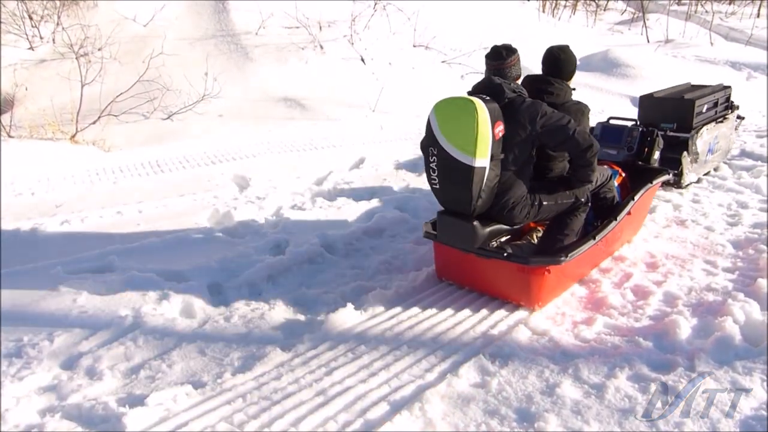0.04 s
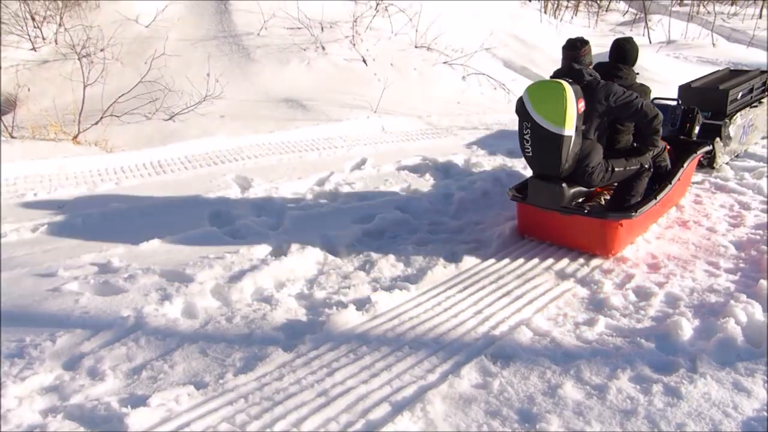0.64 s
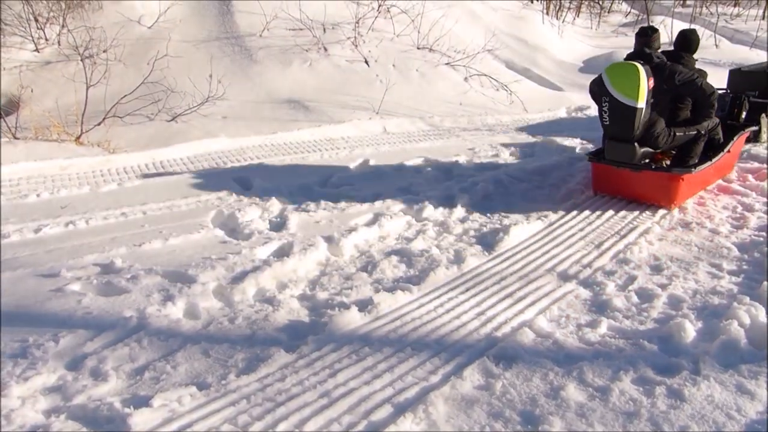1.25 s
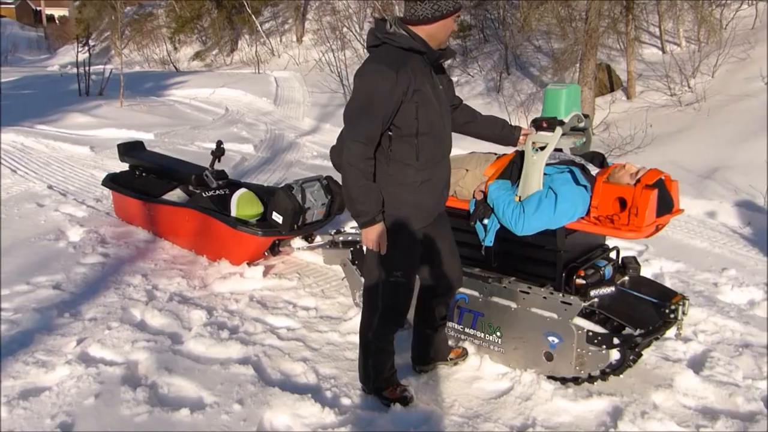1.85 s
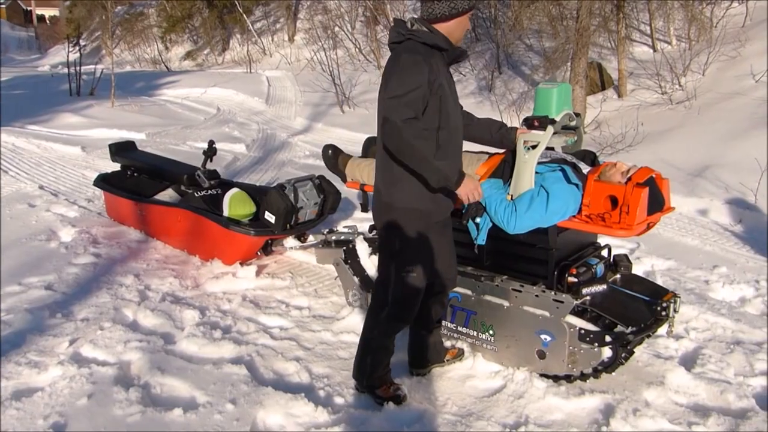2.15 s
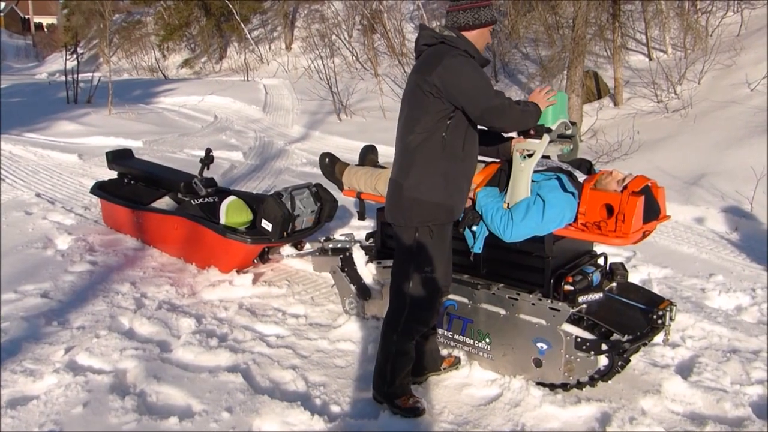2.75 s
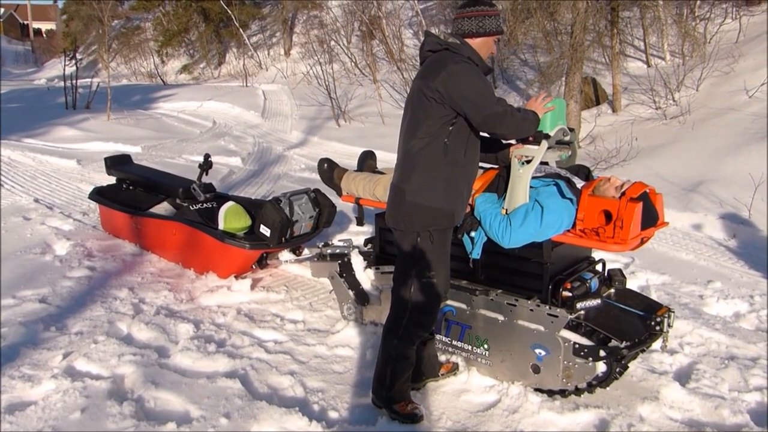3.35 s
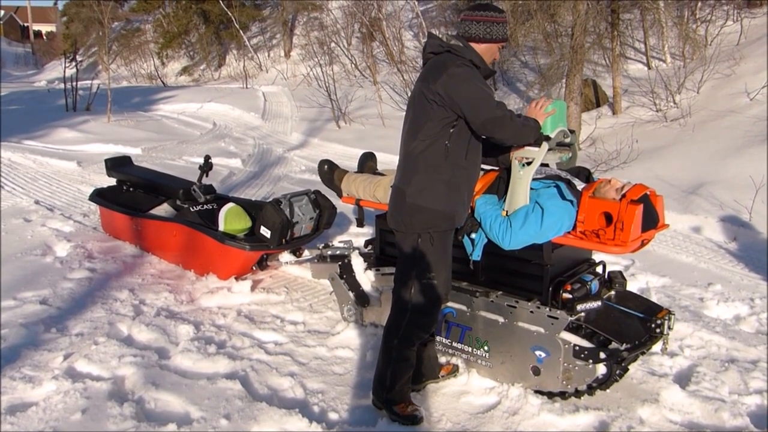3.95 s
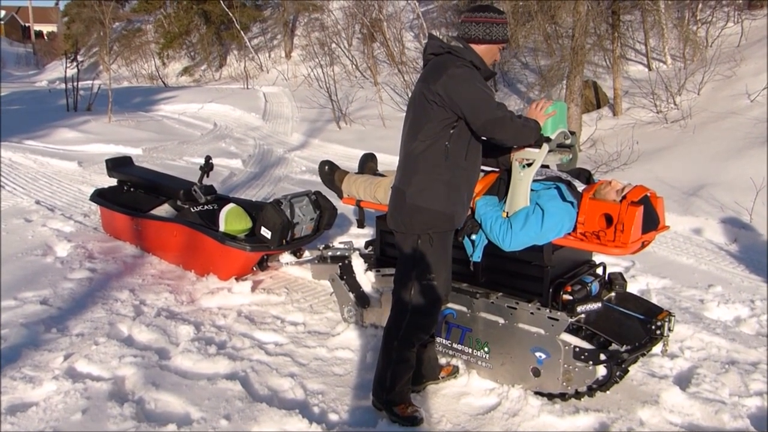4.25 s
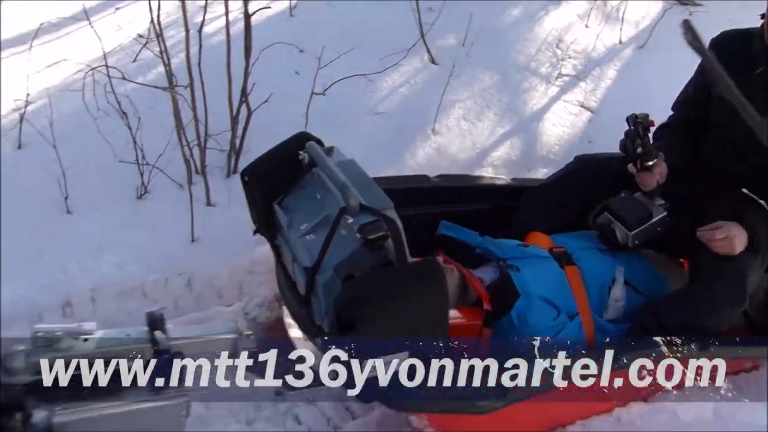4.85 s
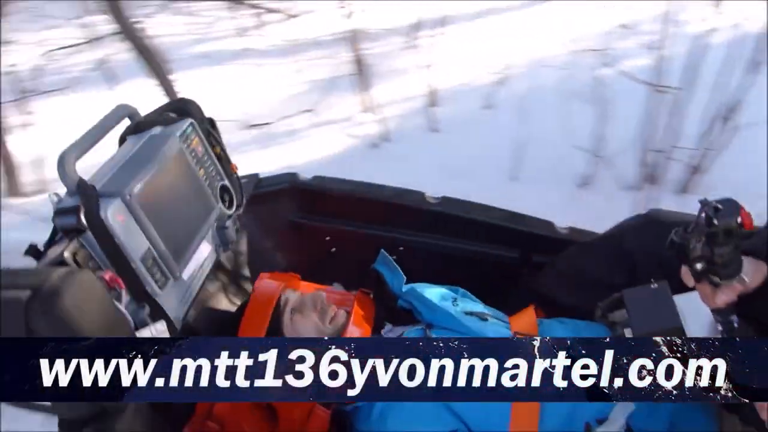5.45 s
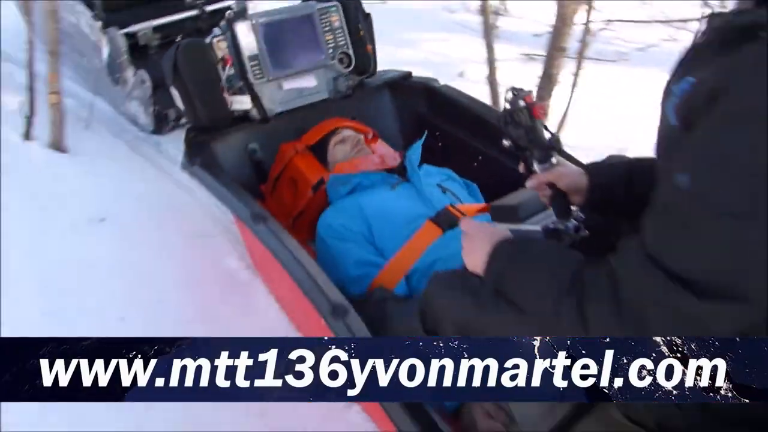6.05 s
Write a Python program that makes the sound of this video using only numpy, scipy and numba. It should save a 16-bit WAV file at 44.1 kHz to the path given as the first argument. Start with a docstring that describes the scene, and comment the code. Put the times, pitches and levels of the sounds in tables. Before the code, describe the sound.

A sled grinds away across snow, a jacket swishes in quiet woods, then snow hisses and thumps against the moving plastic hull.

```python
"""An electric tracked tug pulls a plastic sled over crusty snow, in three moments joined by hard cuts.
It drives away, track and sled grinding the crust under a hiss of loose snow. It stands in a quiet wood
while a jacket swishes, a boot creaks, gear clicks and a far bird calls. Then we ride the sled: snow sprays
and scrapes, lumps thud against the drumming hull, and the whine of the drive sinks as it slows."""
import sys
import numpy as np
from scipy import signal
from scipy.fft import rfft, irfft, next_fast_len
from scipy.io import wavfile
from scipy.ndimage import uniform_filter1d
from numba import njit

SR = 44100
rng = np.random.default_rng(int(sys.argv[2]) if len(sys.argv) > 2 else 0)


def put_to_file(sound):
    """Save the sound as 16-bit audio at rate SR, in the file named by the first command-line argument."""
    columns = np.atleast_2d(sound).T  # one column per channel
    safe = np.clip(columns, -1, 1)
    whole_steps = np.round(safe * 32767)
    wavfile.write(sys.argv[1], SR, whole_steps.astype(np.int16))


N = 269010
TIME = np.arange(N) / SR
LEAVE_END_S, RIDE_START_S = 1.728, 4.660

# speed of the leaving tug, as the pitch of its drive: t/s, f/Hz
LEAVING_PITCH = [(0, 1690), (1.27, 1480), (1.73, 1270)]
# loose snow thrown up as it leaves: t/s, level/dB
LEAVING_SPRAY = [(0, -31.5), (0.16, -33.3), (0.33, -32.5), (0.45, -31.5), (0.55, -33.0), (0.77, -31),
                 (0.92, -33), (0.98, -35), (1.08, -33.5), (1.16, -34), (1.29, -33), (1.36, -35),
                 (1.46, -32.5), (1.57, -33.5), (1.7, -32)]
# hollow resonances of the grinding: multiple of the lowest, filter width/Hz, gain/dB
GRIND_MODES = [(1, 258, -7.5), (1.94, 410, -6), (2.45, 2320, -5)]
# the lowest one swells and ebbs with the crust: middle t/s, half-width/s, gain/dB
GRIND_GROWLS = [(.22, .05, 3), (.49, .03, -0.5), (.76, 0.054, -6), (1.15, .035, 1.5), (1.55, 0.02, 5.5),
                (1.68, 0.057, 3)]
# tone colours of the leaving sled's snow hiss and hull rumble: f/Hz, relative level/dB
FAR_HISS_EQ = [(450, -16.5), (560, -2), (900, 0), (1150, 0.5), (2000, -0.5), (2700, -2.5), (3650, -3.5),
               (4100, 1), (4400, -6.5), (4800, 1.5), (6000, -0.5), (8700, 1), (11000, -3.5), (14500, -12.5),
               (16000, -25)]
FAR_RUMBLE_EQ = [(25, -7), (62, -42), (110, -3.5), (220, 1), (330, 0.5), (440, -6), (540, 2.5), (700, -40),
                 (1500, -28)]
# the sled heaves over ridges; the drive labours: middle t/s, half-width/s, level/dB
RIDGE_SWELLS = [(.15, 0.044, -46.5), (.295, 0.017, -43.5), (.68, 0.1, -49), (1.15, 0.033, -47),
                (1.38, .03, -45), (1.56, 0.14, -47.5)]
LABOUR_SWELLS = [(.03, 0.058, -47), (.66, 0.035, -42), (.98, 0.098, -42), (1.57, 0.045, -43)]
# path of a dip in the hiss: t/s, f/Hz
DIP_PATH = [(.95, 4700), (1.1, 3950), (1.22, 3320), (1.42, 2950)]
# crust chunks hit the sled; gear is handled: t/s, level/dB, f/Hz, nominal width/Hz, t60/s
CRUST_CLACKS = [(1.143, -33, 1250, 600, .07), (1.264, -26, 790, 300, 0.044), (4.698, -27, 740, 400, 0.081),
                (4.935, -26.5, 810, 250, 0.11), (5.294, -27.5, 830, 350, .06), (5.358, -25, 434, 160, 0.13),
                (5.413, -25, 770, 400, 0.04), (5.462, -26, 12500, 3500, .04), (5.581, -24, 900, 350, 0.045),
                (5.707, -27.5, 900, 350, 0.046), (5.984, -26, 710, 400, 0.036),
                (6.088, -25.5, 706, 400, 0.084)]
GEAR_TAPS = [(1.860, -53, 6000, 9000, 0.026), (1.956, -35.5, 4260, 4500, 0.041),
             (2.017, -41, 4000, 6000, 0.05), (2.2165, -33.5, 1100, 900, 0.029),
             (2.219, -32, 6650, 9000, 0.03), (2.217, -35, 280, 500, 0.021), (2.230, -50, 5000, 9000, 0.083),
             (2.371, -36.5, 2290, 7000, 0.02), (2.512, -45, 990, 700, .04), (2.521, -34, 950, 800, 0.032),
             (2.683, -47, 10960, 400, 0.056), (2.685, -53, 7850, 400, .05)]
# tone colours of the open air, mid and side: f/Hz, relative level/dB
AIR_MID_EQ = [(25, -11), (60, -13), (130, -11), (220, -4.5), (340, -5.5), (520, -2), (780, 1.5), (1200, -7),
              (1700, -14), (2300, -17.5), (3200, -22), (4300, -22), (5000, -21.5), (9500, -22),
              (15500, -28)]
AIR_SIDE_EQ = [(60, -26), (130, -14), (220, 1), (500, -4), (780, -2), (1200, -5), (1800, -13), (3200, -17),
               (9500, -20), (15000, -24)]
# faint tones fluttering in the air: f/Hz, filter width/Hz, level/dB
AIR_TONES = [(1404, 160, -72.5), (1930, 160, -85), (2540, 160, -89)]
# strokes of a jacket sleeve: middle t/s, half-width/s, level/dB
SLEEVE_STROKES = [(1.79, 0.14, -64.5), (1.948, 0.022, -50), (1.995, .012, -51), (2.026, 0.015, -50),
                  (2.11, 0.08, -63), (2.44, 0.13, -58.5), (2.545, 0.025, -47.5), (2.69, 0.1, -62),
                  (3.62, 0.077, -70), (4.55, 0.089, -76)]
# tone colours of rubbing fabric and of snow under a sole: f/Hz, relative level/dB
SLEEVE_EQ = [(300, -4), (1500, -4), (3200, -6), (5500, -3.5), (8000, -2.5), (11000, -4), (15000, -13)]
BOOT_EQ = [(100, -18), (330, -25), (480, -10), (750, 1), (1000, 0), (1220, -1), (1450, 0), (1850, 0),
           (2300, -9), (2900, -16), (4500, -6), (8000, -21)]
# a boot presses the snow: start t/s, hold/s, level/dB
BOOT_PRESSES = [(1.943, 0.10, -57.5), (2.322, 0.17, -63.5), (2.502, 0.063, -45.5)]
# creak of the packed snow: f/Hz, width/Hz, gain/dB
CREAK_MODES = [(1010, 120, -6), (1520, 90, -16), (1760, 77, -12)]
# far-off pips: t/s, level/dB
PIP_CUES = [(3.09, -69), (3.385, -62), (3.885, -66)]
# snow spraying beside the ridden sled: t/s, level/dB
RIDE_SPRAY = [(4.7, -27), (4.83, -28.0), (4.93, -27.5), (5.1, -28), (5.3, -26.5), (5.46, -27.0), (5.6, -30),
              (5.88, -27.5), (6.08, -29)]
# tone colours of snow against the hull on the ride: f/Hz, relative level/dB
NEAR_HISS_EQ = [(2590, -34), (4400, -7.5), (4790, -3), (5520, 0), (8450, -0.5), (13000, -15.5),
                (14600, -24), (15500, -46)]
CRUNCH_EQ = [(900, -10), (1500, 4.5), (2200, 0.5), (3000, 1.5), (3600, -0.5), (4080, 3), (4400, -5.5),
             (5500, -18), (9000, -30)]
SCRAPE_EQ = [(250, -28), (370, 1.5), (440, 9.5), (540, 1.5), (640, 3), (790, 7.5), (920, 2.5), (1300, -0.5),
             (1700, -21), (3000, -28)]
DRUM_EQ = [(25, -33), (55, -43), (85, -12), (120, -3.5), (175, 4.5), (280, 3), (360, -6.5), (500, -38),
           (1000, -56)]
# whine of the drive on the ride: t/s, f/Hz, level/dB
RIDE_WHINE = [(4.66, 1810, -35.5), (4.77, 1735, -39), (4.85, 1695, -43), (4.93, 1665, -35),
              (4.98, 1630, -45), (5.02, 1605, -37), (5.07, 1570, -42), (5.12, 1620, -42), (5.17, 1615, -38),
              (5.23, 1570, -45), (5.26, 1380, -45), (5.30, 1310, -39.5), (5.37, 1240, -52),
              (5.5, 1187, -53)]
# lumps of snow hit the hull: t/s, level/dB, f/Hz
SNOW_LUMPS = [(4.700, -23, 196), (4.768, -20, 225), (4.964, -17, 213), (5.019, -24, 290), (5.073, -22, 250),
              (5.106, -21, 277), (5.136, -22, 201), (5.175, -32, 215), (5.235, -24.5, 216),
              (5.359, -22, 187), (5.414, -18.5, 245), (5.443, -25, 257), (5.482, -26.5, 241),
              (5.531, -21.5, 225), (5.539, -21, 153), (5.589, -19.5, 205), (5.633, -15, 188),
              (5.69, -24, 173), (5.71, -28, 240), (5.745, -20, 209), (5.785, -21.5, 193),
              (5.879, -22.5, 212), (5.904, -23.5, 204), (5.947, -23, 188), (5.983, -9.5, 236)]
# modes of the plastic hull: multiple of the lump's pitch, t60/s, relative level/dB
HULL_MODES = [(.68, .04, -4), (1, 0.027, 15.5), (1.5, 0.023, 11.5), (3.4, .014, -12)]


def undb(db):
    return 10 ** (np.asarray(db) / 20)


def unit(x):
    """Scale to rms 1."""
    return x / np.sqrt(np.mean(x ** 2))


def curves(table):
    """The columns of a table, joined by straight lines in time."""
    s, *columns = np.transpose(table)
    return [np.interp(TIME, s, c) for c in columns]


def swell(middle_s, width_s):
    """A rounded rise to 1 and fall."""
    return 1 / np.cosh(np.clip((TIME - middle_s) / width_s, -30, 30))


def swells(table):
    """Gain of a row of overlapping swells."""
    return np.sqrt(sum((undb(db) * swell(s, width)) ** 2 for s, width, db in table))


def step(middle_s, time_s):
    """A smooth change from 0 to 1."""
    return (1 + np.tanh((TIME - middle_s) / time_s)) / 2


def walk(rate_hz):
    """Smooth random wandering, spread near 1."""
    k = max(int(SR / rate_hz), 1)
    steps = np.repeat(rng.standard_normal(N // k + 1), k)[:N]
    return 1.64 * uniform_filter1d(uniform_filter1d(steps, k), k)


def grains(per_s, spread_db):
    """Two unrelated streams of random-sized clicks, as of breaking snow crystals."""
    hit = rng.random((2, N)) < per_s / SR
    return hit * rng.standard_normal((2, N)) * undb(spread_db * rng.standard_normal((2, N)))


def colour(x, eq):
    """Shape by an EQ curve; rms 1."""
    hz, db = np.transpose(eq)
    size = next_fast_len(N)
    f = np.maximum(np.fft.rfftfreq(size, 1 / SR), 1)
    gain = undb(np.interp(np.log(f), np.log(hz), db))
    return unit(irfft(rfft(x, size) * gain, size)[..., :N])


@njit
def svf(x, hz, width):
    """State-variable band-pass with a moving centre."""
    y, band, low = np.empty(len(x)), 0., 0.
    for i in range(len(x)):
        g, k = np.tan(np.pi * hz[i] / SR), width / hz[i]
        v = (band + g * (x[i] - low)) / (1 + g * (g + k))
        band, low, y[i] = 2 * v - band, low + 2 * g * v, k * v
    return y


def ring(x, hz, width):
    """Pass every channel through one resonance."""
    return np.array([svf(c, hz * np.ones(len(c)), float(width)) for c in x])


def steep_ring(x, hz, width):
    """The same resonance twice, for a tighter band; rms 1."""
    return unit(ring(ring(x, hz, width), hz, width))


def stereo(pair, side_db, pan_db=0):
    """Use two streams as mid and side, leaning left by pan_db."""
    mid, side = pair[0], pair[1] * undb(side_db)
    return np.array([(mid + side) * undb(pan_db / 2), (mid - side) * undb(-pan_db / 2)])


def grinding(start_hz=820, fade_db_per_s=1.15):
    """Track and sled grind the crust through hollow resonances that sink with speed and fade away."""
    speed, = curves(LEAVING_PITCH)
    lowest_hz = start_hz * (speed / speed[0]) ** .65
    modes = []
    for multiple, width, db in GRIND_MODES:
        hz = multiple * lowest_hz * (1 + 0.029 * walk(24.93))
        modes.append(steep_ring(grains(7000, 1.33), hz, width) * undb(db + 0.56 * walk(21.7)))
    growl_db = sum(db * swell(s, width) for s, width, db in GRIND_GROWLS)
    dull_db = -6.5 * step(1.32, 0.034)  # the upper resonances drop away
    grind = modes[0] * undb(growl_db) + sum(modes[1:]) * undb(dull_db)
    return stereo(grind, side_db=-25.5) * undb(-0.33 - fade_db_per_s * TIME)


def far_snow():
    """Grinding and the hiss of loose snow rise and fall together as the tug leaves."""
    spray_db, = curves(LEAVING_SPRAY)
    crust_db = 0.45 * walk(34.94)  # harder and softer patches
    grind = grinding()
    hiss = stereo(colour(grains(22000, 0.95), FAR_HISS_EQ), side_db=-18) * undb(0.72)
    return (grind + hiss) * undb(spray_db + crust_db)


def far_rumble(fade_db_per_s=5.5):
    """The leaving hull rumbles as it heaves over ridges."""
    heave = np.hypot(undb(-47 - fade_db_per_s * TIME), swells(RIDGE_SWELLS))
    return stereo(colour(grains(900, 2.2), FAR_RUMBLE_EQ), side_db=-19) * heave


def gear_tone(hz, rough, flicker_db):
    """A whine shaken in pitch and level by the track's uneven load, out of step left and right."""
    phase = 2 * np.pi * np.cumsum(hz * (1 + rough * walk(260))) / SR
    return np.sqrt(2) * np.sin(phase + np.array([[0], [.25]])) * undb(flicker_db * walk(90))


def far_drive():
    """The electric drive peeks through the grinding whenever it labours."""
    hz, = curves(LEAVING_PITCH)
    return gear_tone(hz * (1 + 0.0152 * walk(70)), rough=0.0182, flicker_db=2) * swells(LABOUR_SWELLS)


def track_frame(start_s=0.73, fade_db_per_s=7.5):
    """The track frame starts a bright ring, then dies away."""
    envelope = step(start_s, .05) * undb(-42.5 - fade_db_per_s * (TIME - start_s))
    return stereo(steep_ring(grains(4000, 2.2), hz=4150, width=380), side_db=-29) * envelope


def sliding_dip(snow, depth_db=-2.5):
    """A hollow opens in the hiss, slides down in pitch and closes again."""
    hz, = curves(DIP_PATH)
    cut = 1 - undb(depth_db * swell(1.2, .2))
    return snow - ring(snow, hz, width=500) * cut


def knocks(table, side_db, attack_s=0.0024):
    """Small hard things strike: a short noise burst in one resonance each."""
    age = np.arange(SR // 6) / SR
    attack = 1 - np.exp(-age / attack_s)
    out = np.zeros((2, N + len(age)))
    for s, db, hz, width, t60 in table:
        burst = steep_ring(rng.standard_normal((2, len(age))), hz, 1.16 * width)
        out[:, int(s * SR):][:, :len(age)] += burst * attack * undb(db - 60 * age / t60)
    return stereo(out[:, :N], side_db)


def wood_air():
    """A soft bed of open air with faint fluttering tones in it."""
    mid = colour(rng.standard_normal(N), AIR_MID_EQ)
    side = colour(rng.standard_normal(N), AIR_SIDE_EQ)
    air = stereo([mid, side], side_db=-14) * undb(-61.5 + .5 * walk(5.43))
    tones = sum(steep_ring(rng.standard_normal((2, N)), hz, width) * undb(db + 1.5 * walk(25))
                for hz, width, db in AIR_TONES)
    return air + stereo(tones, side_db=-20)


def jacket_and_boot(attack_s=0.013, release_s=0.021):
    """Fabric swishes and a boot packs the snow with a hollow creak, both in small uneven slips."""
    slips_db = 1.5 * walk(110)
    swish = colour(grains(12000, 1), SLEEVE_EQ) * swells(SLEEVE_STROKES)
    weight = np.zeros(N)
    for s, hold, db in BOOT_PRESSES:
        press = np.clip((TIME - s) / attack_s, 0, 1)
        release = np.exp(-np.maximum(TIME - s - hold, 0) / release_s)
        weight += undb(db) * press * release
    creak = sum(unit(ring(grains(1500, 2), hz, width)) * undb(db) for hz, width, db in CREAK_MODES)
    crunch = colour(grains(3500, 2.9), BOOT_EQ) * undb(-1.5)
    return stereo((swish + (crunch + creak) * weight) * undb(slips_db), side_db=-17.5)


def pips(hz=1340, width_s=0.012):
    """Short, wavering far-off tones, all at one pitch."""
    phase = 2 * np.pi * np.cumsum(hz * (1 + 0.0245 * walk(150))) / SR
    return np.sqrt(2) * np.sin(phase) * swells([(s, width_s, db) for s, db in PIP_CUES])


def bird(at_s=4.408, db=-68):
    """A small bird far off: one thin note that rises and levels out."""
    hz = 7150 + 250 * np.tanh((TIME - at_s) / .016 + 1) + 35 * walk(200)
    return np.sqrt(2) * np.sin(2 * np.pi * np.cumsum(hz) / SR) * undb(db) * swell(at_s, 0.01)


def hull_pressure(dig_lead_s=0.0092, lift_lag_s=0.013):
    """Gain in dB as the hull digs in before each lump and lifts off behind it."""
    return sum(undb(db) * (9 * swell(s - dig_lead_s, 0.014) - 12.5 * swell(s + lift_lag_s, 0.013))
               for s, db, _ in SNOW_LUMPS)


def near_snow(scrape_fade_db_per_s=5.5):
    """Close up, snow sprays and crunches to the right, scrapes the left wall and drums under the floor."""
    age = np.maximum(TIME - RIDE_START_S, 0)
    spray_db, = curves(RIDE_SPRAY)
    crunch_db = spray_db - 5.5 - 2.5 * step(5.3, 0.12)  # the sled slows onto softer snow
    scrape_db = spray_db - 4.5 - scrape_fade_db_per_s * age
    rough_stretch = undb(-32.5) * swell(5.17, 0.71)
    hiss = stereo(colour(grains(30000, 1.4), NEAR_HISS_EQ), side_db=-5.5, pan_db=-1.7)
    crunch = stereo(colour(grains(12000, 1.3), CRUNCH_EQ), side_db=-3, pan_db=-1.3) * undb(crunch_db)
    scrape = stereo(colour(grains(3000, 1.6), SCRAPE_EQ), side_db=-2, pan_db=5.5) * undb(scrape_db)
    drum = stereo(colour(grains(1200, 4.3), DRUM_EQ), side_db=-11.5) * rough_stretch
    snow = hiss * undb(spray_db + 0.37) + crunch + scrape + drum
    return snow * undb(hull_pressure() + 0.19 * walk(35))


def near_drive():
    """The drive whines on a rough, sinking gear tone, over a low hollow hum."""
    hz, db = curves(RIDE_WHINE)
    hum = steep_ring(rng.standard_normal((2, N)), hz / 4, width=55)
    whine = gear_tone(hz, rough=0.0104, flicker_db=2.5) * undb([[1.5], [-1.5]])  # leans left
    return (whine + stereo(hum, side_db=-2, pan_db=10) * undb(-5)) * undb(db)


def hull_bumps(low_cut_hz=113):
    """Lumps of snow thud on the heavily damped plastic hull, which is too small to radiate deep bass."""
    out = np.zeros(N)
    for s, db, hz in SNOW_LUMPS:
        age = np.maximum(TIME[int(s * SR):][:SR // 10] - s, 0)
        thud = sum(undb(mode_db - 60 * age / t60) * np.sin(2 * np.pi * multiple * hz * age)
                   for multiple, t60, mode_db in HULL_MODES)
        contact_s = .00022 / undb(db)  # weak lumps push more slowly
        thud *= 1 - np.exp(-(age / contact_s) ** 2)
        thud = uniform_filter1d(np.pad(thud, 16), size=26)[:len(age)]  # soft snow rounds the blow
        out[int(s * SR):][:len(age)] += undb(db + 0.5) * thud / np.abs(thud).max()
    return signal.sosfilt(signal.butter(4, low_cut_hz, "high", fs=SR, output="sos"), out)


def scene(cut_fade_s=0.0051):
    """Leaving, standing and riding, cut one after the other."""
    away = np.exp(-np.maximum(TIME - LEAVE_END_S, 0) / cut_fade_s)
    aboard = uniform_filter1d(1. * (TIME > RIDE_START_S), size=40)
    parked = 1 - away - aboard
    leaving = sliding_dip(far_snow()) + track_frame() + far_rumble() + far_drive()
    riding = near_snow() + near_drive() + hull_bumps()
    clacks = knocks(CRUST_CLACKS, side_db=-21)
    standing = wood_air() + pips() + bird() + jacket_and_boot() + knocks(GEAR_TAPS, side_db=-33)
    return away * leaving + parked * standing + aboard * riding + clacks


def record(dry, offset=-.0019, top_hz=15400):
    """Add a tiny steady offset and cut the very top of the treble."""
    return signal.sosfilt(signal.ellip(10, .2, 80, top_hz, fs=SR, output="sos"), dry + offset)


dry = scene()
out = record(dry)
put_to_file(out)
```